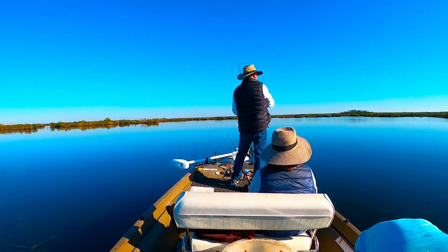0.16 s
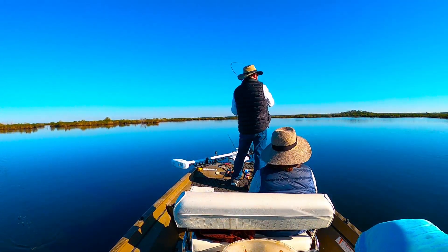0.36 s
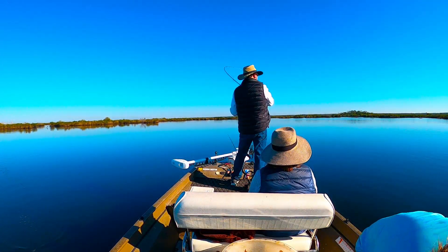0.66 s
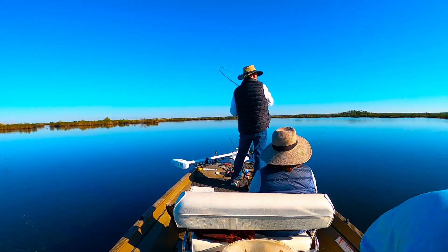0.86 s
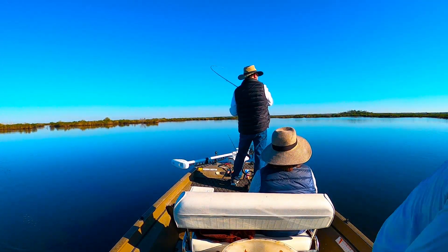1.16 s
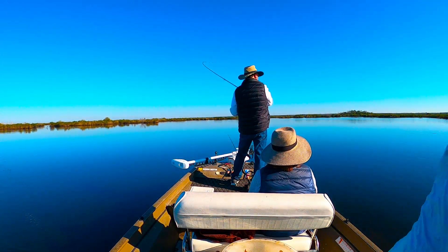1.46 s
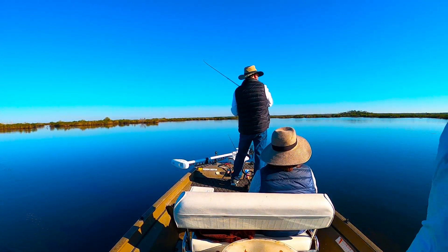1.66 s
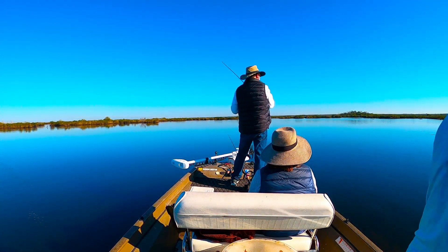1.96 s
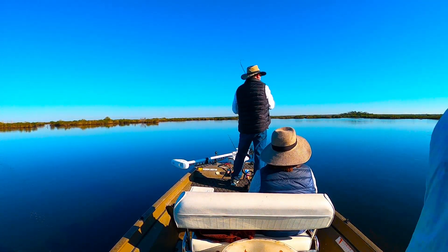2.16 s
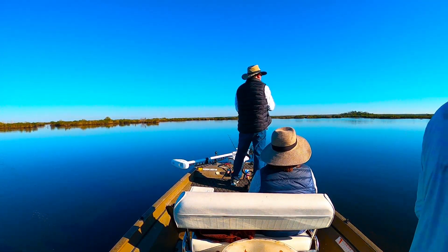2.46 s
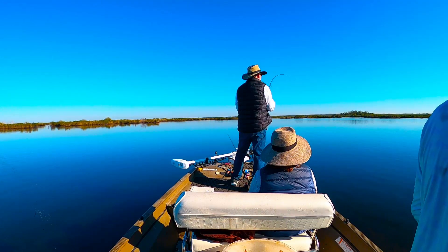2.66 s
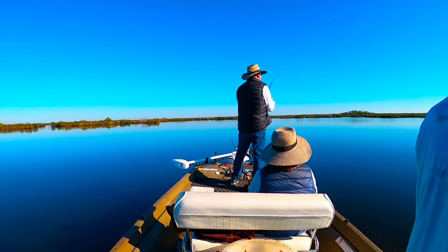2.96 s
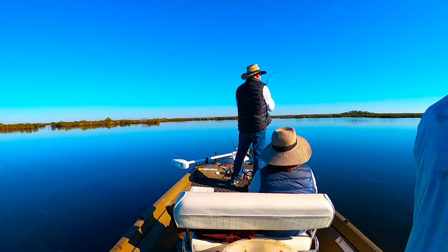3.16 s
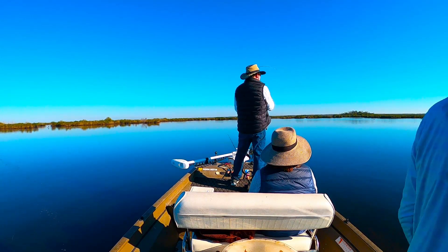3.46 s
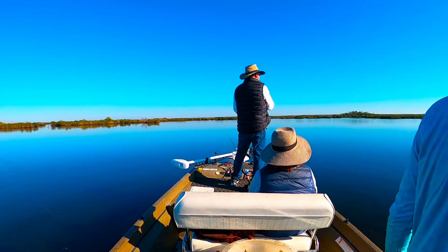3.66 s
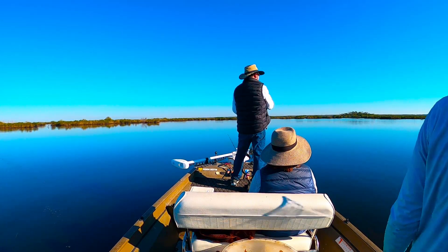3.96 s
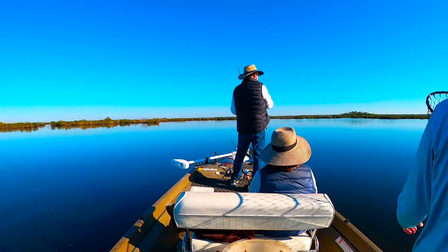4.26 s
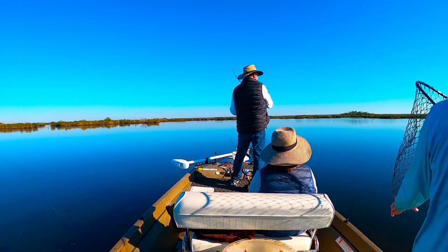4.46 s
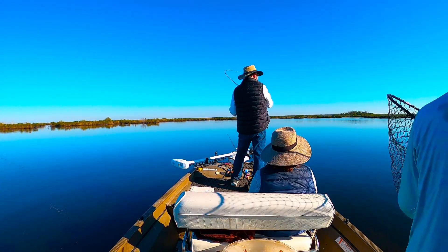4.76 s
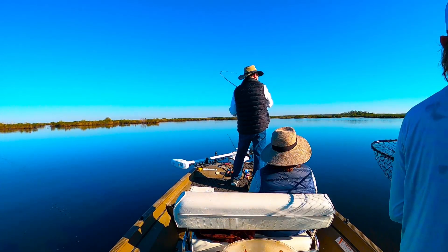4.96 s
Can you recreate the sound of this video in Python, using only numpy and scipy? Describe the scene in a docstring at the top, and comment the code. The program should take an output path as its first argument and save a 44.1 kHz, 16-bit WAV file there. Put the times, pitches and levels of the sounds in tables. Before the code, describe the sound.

A metal pole clatters on a hollow boat deck, then feet and gear thump, with clicks, rustles and a faint line whirr over calm water.

```python
"""Small fishing boat on calm water

A metal pole clatters, then feet and gear thump on the hollow deck. Tackle clicks, shoes scuff, clothes rustle,
a cast line whirrs faintly off its reel, thin squeaks pass and water laps under a faint murmur and hiss.
Blows excite decaying modes and short noise; friction is filtered noise under smooth arches;
the line and the squeaks are narrow bands of noise, and the water is many small bubbles of rising pitch."""
import sys
import numpy as np
from scipy import signal
from scipy.fft import rfft, irfft
from scipy.io import wavfile

SR = 44100
rng = np.random.default_rng(int(sys.argv[2]) if len(sys.argv) > 2 else 0)


def bounce(signal):
    """Save signal as a 16-bit WAV file at the path given by the first command-line argument."""
    frames = np.transpose(np.atleast_2d(signal))
    limited = np.clip(frames, -1, 1)
    pcm = np.round(limited * 32767).astype(np.int16)
    wavfile.write(sys.argv[1], SR, pcm)


N = 225042
TIME = np.arange(N) / SR  # s, the whole scene
RING = np.arange(SR // 2) / SR  # s, the half second given to each blow

# spectrum of hard tackle and of the scraping pole: frequency_hz, relative_db
TACKLE_SPECTRUM = [(300, -27), (1200, -4.5), (2100, 8), (4000, 6), (7000, 5), (10000, -4), (13000, -23),
                   (16000, -55)]
# spectrum of the crowded small modes of the deck panels: frequency_hz, relative_db
PANEL_SPECTRUM = [(40, -35.5), (70, 0), (170, 5), (380, 3.5), (700, -5.5), (1300, -7), (2000, -16.5),
                  (4000, -39.5), (16000, -51)]


def amp(db):
    """Level law: a gain is ten to the power of decibels over twenty."""
    return 10 ** (np.asarray(db) / 20)


def evened(x):
    """Power normalization: scales to rms 1."""
    return x / np.sqrt(np.mean(x ** 2) + 1e-20)


def struck(x):
    """Energy normalization: scales a blow to the energy of 25 ms at rms 1."""
    return x / np.sqrt(np.sum(x ** 2) / (SR / 40) + 1e-20)


def read(points, hz):
    """Interpolation of a tabled curve on a logarithmic frequency axis."""
    f, value = np.transpose(points)
    return np.interp(np.log(hz + 1), np.log(f + 1), value)


def add(mix, s, sound):
    """Superposition: adds a sound to the mix from time s."""
    part = mix[max(round(s * SR), 0):][:len(sound)]
    part += sound[:len(part)]


def colour(x, points, tilt_db=0):
    """Minimum-phase filtering: a causal filter with the given spectrum, tilted by dB per octave."""
    hz = abs(np.fft.fftfreq(4096, 1 / SR))
    tilt = tilt_db * np.log2(hz / 3000 + .1)
    log_gain = np.log(amp(read(points, hz) + tilt))
    # the Hilbert transform of the log gain gives the minimum phase
    taps = np.fft.ifft(np.exp(np.conj(signal.hilbert(log_gain)))).real
    return signal.oaconvolve(x, taps[:len(taps) // 2])[:len(x)]


def drift(per_s):
    """Slow random modulation of rms 1: straight lines between per_s random values a second."""
    knots = rng.standard_normal(N)
    return evened(np.interp(TIME * per_s, np.arange(N), knots))


def burst(t60, rise_s):
    """Transient noise: a quick exponential rise, then a decay of 60 dB in t60 seconds."""
    rise = 1 - np.exp(-RING / rise_s)
    return rng.standard_normal(len(RING)) * amp(-60 * RING / t60) * rise


def ring(modes, spread_db, detune, weight_db=0):
    """Modal superposition: decaying sines, favoured a little differently by each place of impact."""
    hz, db, t60 = np.transpose(modes)
    size, shift, side = rng.standard_normal((3, len(hz)))
    level_db = db + weight_db + spread_db * size
    fade = amp(level_db[:, None] - 60 * RING / t60[:, None])
    mode_hz = hz * (1 + detune * shift)
    return np.sign(side) @ (fade * np.sin(2 * np.pi * mode_hz[:, None] * RING))


def stroke(start, length):
    """Envelope of one movement: a single arch that swells and fades."""
    skew = 0.67  # below 1 the arch peaks early
    progress = np.clip((TIME - start) / length, 0, 1)
    return np.sin(np.pi * progress ** skew)


def whistle(hz, width_hz):
    """Heterodyning: low-passed complex noise is shifted up to a narrow band around a pitch."""
    turns = np.cumsum(hz * np.ones(N)) / SR
    low_pass = signal.butter(2, width_hz / 2, fs=SR, output="sos")
    fuzz = signal.sosfilt(low_pass, [1, 1j] @ rng.standard_normal((2, N)))
    return evened((fuzz * np.exp(2j * np.pi * turns)).real)


def background(rumble_db=-52, air_db=-77.5, sway_db=3.2):
    """Stationary and modulated noise: the hull murmurs as it rocks, under a faint hiss of open air."""
    # murmur of the hull: frequency_hz, relative_db
    rumble_spectrum = [(12, -26.5), (22, 5.5), (45, -3.5), (68, 5), (97, -11), (130, -4.5), (170, -16),
                       (270, -24.5), (480, -40), (1100, -74)]
    # hiss of open air: frequency_hz, relative_db
    air_spectrum = [(100, -4.5), (400, 1.5), (800, -7), (2000, -9), (5000, -15.5), (8500, -17),
                    (11000, -30.5), (16000, -38.5)]
    hz = np.fft.rfftfreq(N, 1 / SR)
    murmur = irfft(rfft(rng.standard_normal(N)) * amp(read(rumble_spectrum, hz)), N)
    murmur = murmur * amp(sway_db * drift(7))
    hiss = colour(rng.standard_normal(N), air_spectrum)
    return amp(rumble_db) * evened(murmur) + amp(air_db) * evened(hiss)


def pole(clash_db=-3, chatter=0.11, scrape_db=-16, scrape_s=0.0043, wall_db=-4, wall_t60=0.1, wall_tilt_db=2):
    """Modal excitation: scraping, chattering contacts ring the pole and the crowded modes of its thin wall."""
    # knocks of the metal pole: start_s, level_db, treble_tilt_db_per_octave
    knocks = [(0.0, -30.5, -3.5), (0.023, -43, -1.5), (0.0998, -26.5, -2.5), (0.121, -31.5, -4.5),
              (0.2081, -34, -3.5), (0.2644, -34, -3), (0.297, -34, -5), (0.34, -41, -7.5),
              (0.388, -48, -1.5)]
    # strongest modes of the pole: frequency_hz, relative_db, t60_s
    pole_modes = [(838.5, -12, 0.19), (990, -16, 0.24), (1246, 0, 0.085), (1320, -4.5, 0.14),
                  (2329, 1, 0.064), (2510, 2.5, 0.08), (2513, 1.5, 0.078), (2600, -5, 0.09),
                  (2932, 0, 0.17), (3469, -13, 0.09), (3830, -6.5, 0.1), (5010, -4.5, 0.065),
                  (6150, -24, 0.058), (7034, -14.5, .06)]
    # spectrum of the clash and of the thin wall: frequency_hz, relative_db
    clash_spectrum = [(100, 0.5), (400, 1.5), (700, -9), (1200, 3), (1900, -5), (2600, 1), (4000, -5.5),
                      (7000, -9), (10000, -22), (13000, -31), (16000, -52.5)]
    out = np.zeros(N)
    wall_hz = np.linspace(1000, 11000, num=90) + 45 * rng.standard_normal(90)
    wall_modes = [(hz, 0, wall_t60) for hz in wall_hz]
    wall = colour(ring(wall_modes, spread_db=2.0, detune=0), clash_spectrum, wall_tilt_db)
    for s, db, tilt_db in knocks:
        contact = chatter * burst(t60=0.053, rise_s=0.0015)
        contact[0] += 1  # the first touch
        metal = struck(ring(pole_modes, spread_db=3.5, detune=0.0035)) + amp(wall_db) * struck(wall)
        ringing = signal.fftconvolve(contact, metal)[:len(RING)]
        clash = colour(burst(t60=0.11, rise_s=0.00069), clash_spectrum)
        knock = struck(ringing) + amp(clash_db) * struck(clash)
        add(out, s, amp(db) * struck(colour(knock, [(1, 0)], tilt_db)))
    # the scrape swells into each knock and fades out of it
    scrape = np.zeros(N)
    for s, db, _ in knocks:
        scrape += amp(db + scrape_db) * np.exp(-np.minimum(abs(TIME - s) / scrape_s, 20))
    return out + colour(scrape * rng.standard_normal(N), TACKLE_SPECTRUM)


def thumps(boom_hz=105, panels_db=-4, note_db=6, note_octaves=0.33, build_up=6.5, own_db=-4, own_ring=0.3,
           lowest_hz=40):
    """Impact excitation: a blow rings panel and hull, most near its note; long soft contact leaves low modes."""
    # blows on the deck: start_s, level_db, panel_note_hz, hull_boom_db, grit_db (relative to the blow)
    blows = [(0.028, -23.5, 420, -3.5, -22.5), (0.033, -24, 175.5, -7, -45), (0.057, -24, 64, 7.5, -35.5),
             (0.1, -32, 350, -7.5, -21), (0.3742, -31, 652, -34, -7), (0.376, -26.5, 173.4, -19.5, -25),
             (0.477, -37.5, 183.3, 2.5, -38), (0.481, -53.5, 450, -9, -31), (1.047, -39, 140, 7, -42),
             (1.55, -29.5, 430, 6.5, -16.5), (1.548, -21.5, 176.8, -7.5, -50), (1.553, -25.5, 250, -5, -32),
             (1.628, -30.5, 150, 7.5, -25.5), (1.773, -37.5, 226, 4.5, -40), (2.239, -40, 280, -4, -24),
             (3.635, -25, 90, 4, -27.5), (3.654, -17, 105.5, 9, -32.5), (3.685, -18.5, 391, -1, -16),
             (3.694, -20.5, 307, 4, -23.5), (3.7223, -23, 1147, -2.5, -8), (3.724, -20.5, 190, -3.5, -25),
             (3.741, -23, 629, 7.5, -23), (3.751, -20, 62.3, 14, -32.5), (3.837, -47.5, 1220, 1, -10.5),
             (3.842, -40.5, 364, 2, -24), (3.889, -50.5, 427, 6, -11), (3.938, -28.5, 91, 12.5, -44),
             (4.009, -42.5, 340, -4, -35), (4.492, -41.5, 200, 3.5, -30.5)]
    # modes of the hull and its deck panels: frequency_hz, relative_db, t60_s
    hull_modes = [(60, 3.5, 0.25), (99.3, -5.5, 0.37), (129.2, 1.5, 0.089), (150.8, 0.5, 0.3),
                  (185.2, 0, 0.3), (216.8, -8, 0.42), (256, -2.5, 0.49), (281.4, 0, 0.16), (335.7, 0, 0.2),
                  (420, -1.5, 0.084), (515, -5.5, 0.14), (557, -6.5, 0.14), (629, -0.5, 0.076),
                  (704, -9, 0.15), (830, -11.5, 0.11), (1037, -13, 0.087), (1222, -3, 0.1),
                  (1357, -3.5, 0.12), (1476, -8.5, 0.14)]
    # decay of the crowded small modes: frequency_hz, t60_s
    panel_decay = [(60, 0.6), (200, 0.34), (500, 0.17), (1500, 0.17), (8000, 0.12)]
    # spectrum of grit under the blow: frequency_hz, relative_db
    grit_spectrum = [(200, -18.5), (900, 22.5), (2500, 1.5), (5500, -7.5), (8000, -18.5), (11000, -31.5),
                     (16000, -37.5)]
    contact_cycles = 0.11  # a blow presses for this share of one cycle of the panel's note
    punch_db, punch_s = 4.5, 0.15  # extra level at first, until energy has leaked into the hull

    def favour_db(hz, note_hz, boom_db):
        """Frequency weighting: a boom below boom_hz and a peak at the panel's note."""
        boom = boom_db / (1 + (hz / boom_hz) ** 6)
        return boom + note_db * np.exp(-(np.log2(hz / note_hz) / note_octaves) ** 2)

    out = np.zeros(N)
    hull_hz, grid_hz = np.array(hull_modes)[:, 0], np.geomspace(30, 16000, num=100)
    for s, db, note_hz, boom_db, grit_db in blows:
        modes = ring(hull_modes, spread_db=1, detune=0.0052, weight_db=favour_db(hull_hz, note_hz, boom_db))
        # crowded modes: noise that decays at its own rate in each frequency band
        hz, t, z = signal.stft(rng.standard_normal(len(RING)), SR, nperseg=256)
        decay = amp(-60 * t / read(panel_decay, hz)[:, None])
        dense = signal.istft(z * decay, SR)[1][:len(RING)]
        dense_db = read(PANEL_SPECTRUM, grid_hz) + favour_db(grid_hz, note_hz, boom_db)
        dense = colour(dense, np.c_[grid_hz, dense_db])

        contact_s = contact_cycles / note_hz
        soft_hz = np.clip(1 / (2 * np.pi * contact_s), 40, 8000)
        soft = signal.butter(2, soft_hz, fs=SR, output="sos")
        swell = 1 - np.exp(-RING / (build_up * contact_s))  # the shaking takes a moment to spread
        punch = amp(punch_db * np.exp(-RING / punch_s))
        body = signal.sosfilt(soft, swell * punch * (struck(modes) + amp(panels_db) * struck(dense)))

        own_fade = amp(-60 * RING / (own_ring * read(panel_decay, note_hz)))
        own = signal.sosfilt(soft, own_fade * np.sin(2 * np.pi * note_hz * RING))
        grit = colour(burst(t60=0.087, rise_s=0.0019), grit_spectrum) * swell
        blow = struck(struck(body) + amp(own_db) * struck(own))
        add(out, s, amp(db) * (blow + amp(grit_db) * struck(grit)))
    return signal.sosfilt(signal.butter(2, lowest_hz, "highpass", fs=SR, output="sos"), out)


def clothes(snaps_per_s=500, snaps_db=-3, patchy_db=2.5):
    """Dry friction: fabric gives steady hiss and random snaps, patchy in level, with each movement."""
    # movements that rub the clothes: start_s, length_s, level_db (before the arch), treble_tilt_db_per_octave
    rubs = [(0.152, 0.38, -60, -0.5), (1.013, 0.14, -59.5, -3.5), (1.258, 0.5, -69.5, -0.5),
            (1.567, 0.34, -52.5, -2.5), (1.823, 0.25, -61.5, -2.5), (1.962, 0.51, -74, 0.5),
            (3.019, 0.59, -73, 0.5), (3.373, 0.53, -65.5, -2.5), (3.621, 0.2, -54, -2.5),
            (3.876, 0.089, -62, -3), (4.005, 0.082, -62.5, -2.5), (4.641, 0.12, -70.5, -1.5),
            (4.979, 0.23, -68.5, -2)]
    # spectrum of rubbed fabric: frequency_hz, relative_db
    cloth_spectrum = [(200, 6), (1000, -3.5), (2800, -5), (6500, -9), (9000, -12), (12000, -24.5),
                      (16000, -23)]
    snaps = (rng.random(N) < snaps_per_s / SR) * rng.standard_normal(N)
    rub = evened(rng.standard_normal(N)) + amp(snaps_db) * evened(snaps)
    rub = rub * amp(patchy_db * drift(78))
    out = np.zeros(N)
    for start, length, db, tilt_db in rubs:
        out += amp(db) * stroke(start, length) * evened(colour(rub, cloth_spectrum, tilt_db))
    return out


def tackle(scatter_db=-4):
    """Impulse and scattering: dry clicks are smeared briefly by the inside of the boat."""
    # clicks of tackle: start_s, level_db, treble_tilt_db_per_octave
    clicks = [(0.43, -59, -5.5), (0.441, -66.5, 19), (1.0321, -62.5, -3), (1.62, -41, -11),
              (1.629, -52.5, -2.5), (1.691, -63, -5), (1.706, -53.5, -8), (1.719, -53, -3),
              (1.737, -56.5, -2), (1.755, -53.5, -5), (1.777, -56, -6), (1.988, -65.5, -0.5),
              (2.04, -63.5, 3), (2.131, -63.5, -1.5), (2.168, -64, -0.5), (3.284, -61.5, -15.5),
              (3.406, -68, -5), (4.129, -70.5, 2), (4.286, -70.5, 6.5), (4.499, -74.5, -9), (5.017, -65, 2)]
    out = np.zeros(N)
    for s, db, tilt_db in clicks:
        direct = burst(t60=0.073, rise_s=0.00055)
        scattered = burst(t60=0.15, rise_s=0.0011)
        click = struck(direct) + amp(scatter_db) * struck(scattered)
        add(out, s, amp(db) * struck(colour(click, TACKLE_SPECTRUM, tilt_db)))
    return out


def shoes(squeak_db=-13, patchy_db=3.0):
    """Sliding friction: the slips of a dragging sole shake the deck panels and rasp faintly."""
    # shoes dragging on the deck: start_s, length_s, relative_db
    scuffs = [(0.692, 0.14, -50), (0.821, 0.064, -58.5), (2.215, 0.12, -50.5), (4.635, 0.079, -58.5)]
    # spectrum of the rasping sole: frequency_hz, relative_db
    sole_spectrum = [(300, -15), (700, 16.5), (1100, -13), (1650, 11), (2400, -10), (3800, -6),
                     (6000, -13.5), (16000, -38)]
    slips = rng.standard_normal(N) * amp(patchy_db * drift(83))
    deck = evened(colour(slips, PANEL_SPECTRUM, tilt_db=-15.0))
    sole = evened(colour(slips, sole_spectrum))
    drag = sum(amp(db) * stroke(start, length) for start, length, db in scuffs)
    return (deck + amp(squeak_db) * sole) * drag


def reel(waver=0.045, overtone_db=-7, flutter_db=4.0, whistle_db=-8):
    """Source and resonator: a fuzzy whistle sinks as the line slows; overtones light up at spool resonances."""
    # line running off the reel: time_s, pitch_hz, relative_db
    whirr = [(1.8, 2750, -61), (1.925, 1744, -60.5), (2.04, 1950, -73), (2.134, 2556, -62),
             (2.354, 1893, -62.5), (2.494, 1973, -59.5), (2.532, 1847, -56.5), (2.659, 2110, -59),
             (2.772, 1211, -55.5), (2.82, 1126, -56.5), (2.85, 1500, -58.5), (3.0, 1426, -81.5)]
    # resonances of the spool: frequency_hz, relative_db
    spool_spectrum = [(1100, -7.5), (1500, 4), (1950, 0), (2300, 2), (2900, -7), (4000, -6.5), (4700, -6),
                      (5600, 0.5), (7000, -24)]
    s, hz, db = np.transpose(whirr)
    pitch = np.interp(TIME, s, hz) * (1 + waver * drift(40))
    line = np.zeros(N)
    for k in range(1, 6):
        gain = amp(overtone_db * np.log2(k) + flutter_db * drift(30))
        line += gain * whistle(k * pitch, width_hz=240 * k ** 1.4)  # higher overtones blur more
    level_db = whistle_db + np.interp(TIME, s, db, left=-np.inf, right=-np.inf)
    return colour(line, spool_spectrum) * amp(level_db)


def squeaks():
    """Narrow-band noise: faint, thin squeaks at the very top of the treble."""
    # thin, very high squeaks: start_s, length_s, level_db (before the arch)
    squeak_times = [(3.032, 0.12, -82.5), (3.224, 0.096, -77)]
    envelope = sum(amp(db) * stroke(start, length) for start, length, db in squeak_times)
    return whistle(13700, width_hz=400) * envelope


def water(drops_per_s=700, cycles=6, glide=0.057, spread_octaves=0.73):
    """Bubble resonance: ripples at the hull gurgle with tiny bubbles of about one size and rising pitch."""
    # ripples lapping at the side: start_s, length_s, level_db (before the arch), middle_bubble_pitch_hz
    laps = [(3.105, 0.057, -67.5, 1480), (3.336, 0.14, -63, 480), (3.388, 0.044, -58.5, 867),
            (3.416, 0.26, -67.5, 770)]
    fizz, pitches = [], np.geomspace(400, 1900, num=16)
    for hz in pitches:
        age = RING[:SR // 16] * hz / cycles  # 1 after the given number of cycles
        rise = 1 + glide * np.minimum(age, 2) / 2
        bubble = np.sin(2 * np.pi * cycles * age * rise) * age * np.exp(-2 * age)
        births = (rng.random(N) < drops_per_s / len(pitches) / SR) * rng.standard_normal(N)
        fizz.append(signal.oaconvolve(births, bubble)[:N])
    out = np.zeros(N)
    for start, length, db, middle_hz in laps:
        share = np.exp(-(np.log2(pitches / middle_hz) / spread_octaves) ** 2)
        out += amp(db) * stroke(start, length) * evened(share @ np.array(fizz))
    return out


def scene():
    """Linear superposition of all sources in one channel."""
    on_deck = pole() + thumps() + clothes() + tackle() + shoes() + reel()
    return (background() + on_deck + squeaks() + water())[None]


def record(dry, edge_hz=15650):
    """Band limitation: a steep linear-phase low-pass filter ends the spectrum near edge_hz."""
    low_pass = signal.firwin(511, edge_hz, window=("kaiser", 9), fs=SR)
    return signal.oaconvolve(dry, low_pass[None], "same")


dry = scene()
out = record(dry)
bounce(out)
```